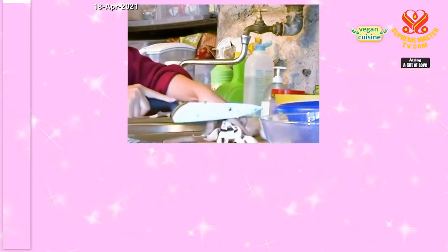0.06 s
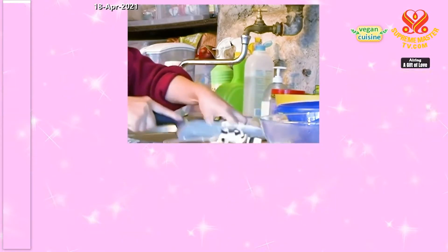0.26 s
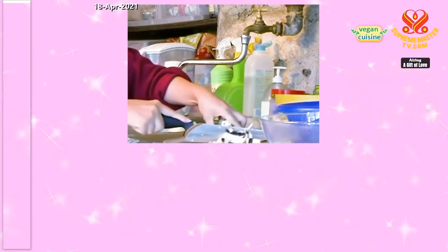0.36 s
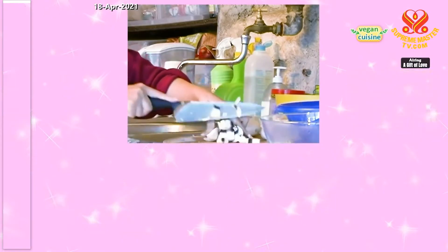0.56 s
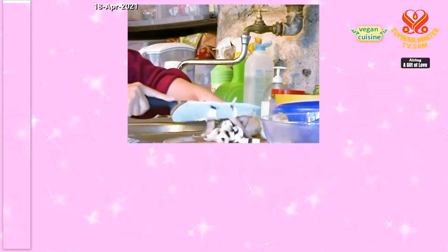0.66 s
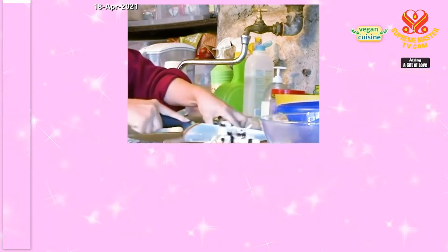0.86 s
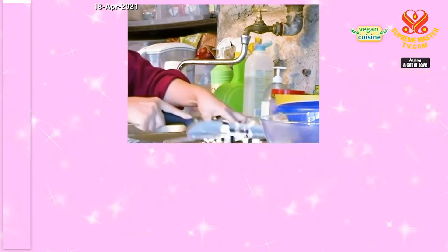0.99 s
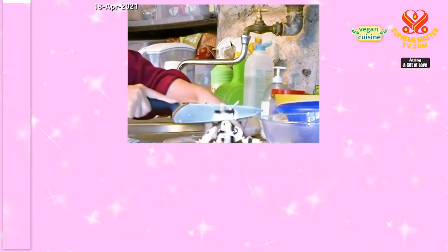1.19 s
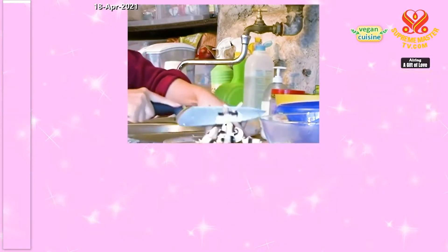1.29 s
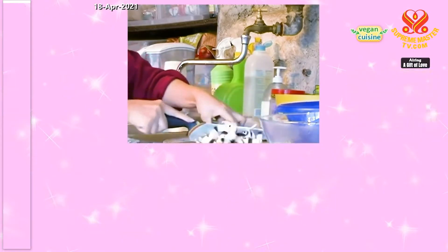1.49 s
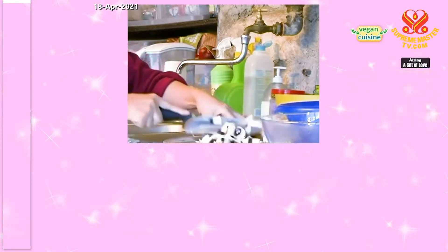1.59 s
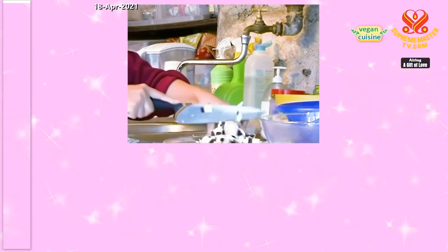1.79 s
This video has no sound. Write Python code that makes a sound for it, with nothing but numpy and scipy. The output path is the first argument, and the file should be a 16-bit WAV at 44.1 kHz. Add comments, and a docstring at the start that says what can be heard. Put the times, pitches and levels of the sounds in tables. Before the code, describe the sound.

A big knife chops vegetables on a cutting board three times at even intervals, each stroke a brief crisp crunch then a loud woody knock with a steel tick, close up in a small hard-walled kitchen.

```python
"""Knife on a kitchen board

A large knife slices through vegetables and lands on a board in a small hard-walled kitchen, three times.
Each stroke is a crackle of snapping fibres, a bright steel tick, the blade's blow and the heel following.
Blows, and faint later bursts, are ringing board modes plus coloured noise that swells and dies in the room.
Filtered noise makes hum, rumble and shuffling below; soft bumps are low resonances, lone snaps bright bursts.
The whole level sinks around each stroke's blows and steps back up."""
import sys
import numpy as np
from scipy import signal
from scipy.fft import rfft, irfft
from scipy.io import wavfile

SR = 44100
rng = np.random.default_rng(int(sys.argv[2]) if len(sys.argv) > 2 else 0)


def generate_wav(signal):
    """Clip the signal to [-1, 1] and save it as 16-bit WAV at the path in sys.argv[1]."""
    frames = np.transpose(np.atleast_2d(signal))
    scaled = np.clip(frames, -1, 1) * 32767
    pcm = np.round(scaled).astype(np.int16)
    wavfile.write(sys.argv[1], SR, pcm)


def rack_gain(trim_db):
    """Turn a fader trim in dB into the linear factor to multiply a signal by."""
    fader = np.asarray(trim_db, float)
    return 10 ** (fader / 20)


N = 81585

# Blade, then heel, meeting the board, and faint later bursts, some where the level steps back up.
# Each row: time in seconds, level at the knee in dB, slope below the knee in dB per octave,
# brightness an octave above the knee in dB, crack level in dB.
BLOWS = [(0.2139, -12.5, -1, 3, -21), (.2430, -10.5, -2.3, 3, -52), (0.263, -13, 1, 2.2, -48),
         (0.351, -37, -8.5, 2, -52), (0.7738, -11.5, 4, 1, -26.5), (.7800, -10.5, -1, -4.2, -36.5),
         (.8060, -8.5, -0.9, -0.6, -58), (.9530, -49.5, 13, 2.5, -69), (1.3355, -10.5, -1.3, -7.5, -28),
         (1.342, -11, 2, -11.5, -45), (1.3680, -10.5, -1, -7.5, -52), (1.5210, -51, 13, -17, -69),
         (1.5650, -52, 1, 4.8, -69)]
# Bright colour of snapping fibres. Each row: frequency in Hz, spectral level in dB per Hz (relative).
FIZZ_COLOUR = [(1880, -19), (3200, -20), (3760, -12.5), (4630, 0), (5360, -1.5), (5660, -4), (6130, -3),
               (9110, -7), (14300, -16), (15900, -33)]


def rms_one(x):
    """Scale to rms 1."""
    return x / np.sqrt(np.mean(x ** 2) + 1e-20)


def at_hz(points, hz, column=1):
    """Read a table on a log-frequency axis."""
    p = np.array(points, float)
    return np.interp(np.log(np.maximum(hz, 1)), np.log(p[:, 0]), p[:, column])


def colour(x, spectrum):
    """Shape a signal by a spectrum."""
    hz = np.arange(N // 2 + 1) * SR / N
    return irfft(rfft(x) * rack_gain(at_hz(spectrum, hz)), N)


def coloured_noise(spectrum):
    """Steady noise of rms 1 with the given spectrum."""
    return rms_one(colour(rng.standard_normal(N), spectrum))


def level_line(points):
    """Gain that follows straight lines in dB between (seconds, dB) points."""
    return rack_gain(np.interp(np.arange(N) / SR, *np.transpose(points)))


def drift(rate_hz):
    """Slow random wander of rms 1: noise through two equal low-pass poles."""
    r = np.exp(-2 * np.pi * rate_hz / SR)
    wander = signal.lfilter([1], [1, -2 * r, r * r], rng.standard_normal(N + SR))
    return rms_one(wander[SR:])  # the first second lets the filter settle


def grains(per_s, spread_db):
    """Dense random clicks of uneven size and random sign."""
    size = rack_gain(spread_db * np.minimum(rng.exponential(1, N), 5))
    sign = rng.choice([-1, 1], N)
    return size * sign * (rng.random(N) < per_s / SR)


def after(s, t60, rise):
    """Envelope that builds up from time s (rise is a time constant) while dying by 60 dB per t60."""
    t = np.maximum(np.arange(N) / SR - s, 0)
    return (1 - np.exp(-t / max(rise, 1e-4))) * np.exp(-np.log(1000) * t / t60)


def slope(hz, low, high):
    """Gain in dB of a blow's colour: a slope for two octaves below the knee, a shelf reached one octave above."""
    knee_hz = 900
    octaves = np.clip(np.log2(hz / knee_hz), -2, 1)
    return octaves * (low if hz < knee_hz else high)


def ring(drive, hz, t60):
    """A two-pole resonance: a unit click sets a decaying sine of height 1 ringing."""
    r, w = rack_gain(-60 / (t60 * SR)), 2 * np.pi * hz / SR
    return signal.lfilter([0, np.sin(w)], [1, -2 * r * np.cos(w), r * r], drive + 1e-18)


def tuned_push(hz, contact_s):
    """A smooth push lasting the contact time, carried on the resonance's own pitch."""
    push = np.hanning(max(int(contact_s * SR), 3))
    return 2 * push / push.sum() * np.cos(2 * np.pi * hz / SR * np.arange(len(push)))


def struck(modes, strength_db, contact_s):
    """Each row of BLOWS pushes every mode for the contact time, with a random strength of its own."""
    scatter_db = 3.5
    s, out = np.transpose(BLOWS)[0], 0
    scatter = rng.standard_normal((len(s), len(modes)))
    for k, (hz, mode_db, t60) in enumerate(modes):
        clicks = np.zeros(N)
        clicks[(s * SR).astype(int)] = rack_gain(strength_db(hz) + mode_db + scatter_db * scatter[:, k])
        drive = np.convolve(clicks, tuned_push(hz, contact_s))[:N]
        out = out + ring(drive, hz, t60)
    return out


def room_hum():
    """Steady coloured noise whose level flickers slightly."""
    # Colour of the room's hum. Each row: frequency in Hz, spectral level in dB per Hz (relative).
    hum_colour = [(18, -57), (30, -44), (81, -21), (134, -6), (226, 5.5), (383, -22.5), (472, -15),
                  (524, -22.5), (647, -9.5), (777, -25.5), (863, -9), (1060, -23), (1250, -11.5),
                  (1710, -5.5), (2280, -7.5), (3210, -14), (3560, -18.5), (6020, -19.5), (7050, -23),
                  (7620, -23.5), (15900, -23.5)]
    level_db, flicker_db, flicker_hz = -52.5, 0.5, 6.5
    return rack_gain(level_db + flicker_db * drift(flicker_hz)) * coloured_noise(hum_colour)


def rumble():
    """Distant rumble: a narrow band of low noise that swells and sinks."""
    # Loudness of the rumble. Each row: time in seconds, level in dB.
    rumble_level = [(0.0, -56), (0.056, -46.5), (0.144, -61), (0.206, -45.5), (0.612, -67.5), (0.85, -40),
                    (0.962, -57.5), (1.19, -73.5), (1.226, -84), (1.272, -58), (1.4, -40), (1.7, -71.5),
                    (1.808, -56), (1.85, -72)]
    centre_hz, width_hz = 84, 24
    edges_hz = [centre_hz - width_hz / 2, centre_hz + width_hz / 2]
    band = signal.butter(2, edges_hz, "band", fs=SR, output="sos")
    return level_line(rumble_level) * rms_one(signal.sosfilt(band, rng.standard_normal(N)))


def shuffle():
    """Low shuffling of hands and board: dull noise with a lumpy level."""
    # Loudness of the shuffling. Each row: time in seconds, level in dB.
    shuffle_level = [(0.0, -47), (0.154, -54.5), (0.354, -41), (0.498, -55.5), (0.704, -52), (0.844, -46),
                     (1.076, -56), (1.324, -53.5), (1.468, -60), (1.592, -48.5), (1.73, -56), (1.85, -45.5)]
    # Its colour. Each row: frequency in Hz, spectral level in dB per Hz (relative).
    shuffle_colour = [(71, -29), (120, -1.5), (238, -4), (371, -3.5), (512, -1.5), (590, -16.5), (741, -6),
                      (793, -12), (900, -22), (1170, -54), (1980, -120)]
    lump_db, lump_hz = 0.83, 21
    lumps = rack_gain(lump_db * drift(lump_hz))
    return level_line(shuffle_level) * lumps * coloured_noise(shuffle_colour)


def bumps():
    """Each bump of hand and board is a soft push on one low resonance."""
    # Soft low bumps. Each row: start of the push in seconds, strength in dB, pitch in Hz, t60 in seconds.
    bump_rows = [(.003, -36.5, 410, 0.046), (.033, -36, 391, 0.053), (.096, -44, 390, 0.038),
                 (0.173, -41, 210, 0.07), (0.743, -38, 211, 0.15), (1.528, -38, 290, 0.043),
                 (1.778, -38.5, 320, .06), (1.797, -41.5, 317, .07), (1.84, -40, 405, 0.066)]
    contact_s, out = 0.006, 0
    for s, db, hz, t60 in bump_rows:
        push, start = tuned_push(hz, contact_s), int(s * SR)
        drive = np.zeros(N + SR)  # room for a push near the end
        drive[start:start + len(push)] = rack_gain(db) * push
        out = out + ring(drive[:N], hz, t60)
    return out


def snaps():
    """Lone snaps and ticks: short bright noise bursts with the colour of the slicing fizz."""
    # Lone snaps. Each row: start in seconds, noise level in dB ahead of the burst's envelope.
    snap_rows = [(0.3516, -35), (0.673, -38), (0.6814, -47), (0.7472, -45), (0.7482, -29), (0.7534, -28.5),
                 (0.952, -49), (1.2754, -39), (1.2894, -34), (1.3024, -27)]
    t60_s, rise_s = 0.0075, 0.0007
    shape = sum(rack_gain(db) * after(s, t60_s, rise_s) for s, db in snap_rows)
    return coloured_noise(FIZZ_COLOUR) * shape


def slicing():
    """Fibres snap in a dense crackle while the blade passes through: one set of clicks in two colours."""
    # Blade through the vegetable, one list per stroke.
    # Each row: time in seconds, body level in dB, fizz level over the body in dB.
    strokes = [
        [(.07, -65, -1), (.11, -59, 1), (.145, -51.5, -3), (.176, -45.5, -2), (.195, -43, -1),
         (.212, -38.5, -1)],
        [(.64, -70, 1), (.668, -62, -2), (.678, -49, 3.5), (.712, -49, -2.5), (.746, -42.5, -2.5),
         (.765, -45.5, -2.5)],
        [(1.215, -67, -2), (1.251, -42.5, -4.5), (1.279, -34.5, -7), (1.3, -36, -5), (1.319, -38, -3),
         (1.332, -41, -2)],
    ]
    # Body of the crackle. Each row: frequency in Hz, spectral level in dB per Hz (relative).
    body_colour = [(530, -31), (900, -19), (1060, -51), (1100, -17.5), (1370, -9.5), (1530, -14),
                   (1650, -10), (2200, -1), (3600, -26), (4680, -46), (7920, -120)]
    fibres_per_s, fibre_spread_db, end_db_per_s = 5500, 2, 696
    t, out = np.arange(N) / SR, 0
    fibres = grains(fibres_per_s, fibre_spread_db)
    body, fizz = rms_one(colour(fibres, body_colour)), rms_one(colour(fibres, FIZZ_COLOUR))
    for rows in strokes:
        s, db, treble_db = np.transpose(rows)
        fade = (t > s[0]) * rack_gain(-end_db_per_s * np.maximum(t - s[-1], 0))
        body_gain = rack_gain(np.interp(t, s, db))
        fizz_gain = rack_gain(np.interp(t, s, db + treble_db))
        out = out + fade * (body_gain * body + fizz_gain * fizz)
    return out


def cracks():
    """The short bright tick of the steel edge, just before the weight lands; fainter ones lead the later bursts."""
    # Colour of the tick. Each row: frequency in Hz, spectral level in dB per Hz (relative).
    crack_colour = [(1940, -31), (3300, -7.5), (4930, 1), (5620, -12), (9900, -11), (11000, -11),
                    (12200, -24), (15000, -27), (15900, -29)]
    tick_db = 5.5  # over the crack level
    lead_s, rise_s, t60_s = 0.0018, 0.0021, 0.031
    shape = sum(rack_gain(row[-1] + tick_db) * after(row[0] - lead_s, t60_s, rise_s) for row in BLOWS)
    return coloured_noise(crack_colour) * shape


def board_ring():
    """Struck resonances: long-ringing modes follow the blow's weight, the short direct knock its crack."""
    # Modes of the board. Each row: frequency in Hz, strength in dB ahead of modes_db, t60 in seconds.
    board_modes = [(238.8, -13, 0.25), (290, -16.5, 0.53), (649.6, -15, 0.39), (717, -17, .25),
                   (805, -43, 0.11), (901, -19.5, 0.49), (1422, -7, .3), (1598, -12, 0.28),
                   (1677, -5.5, 0.24), (1718, -5, .3), (1923, -29, 0.44), (2082, -6, 0.28),
                   (2154, -5, 0.21), (2256, -9.5, 0.28), (2356, -11.5, 0.27)]
    # The direct knock. Each row: frequency in Hz, strength over the crack in dB, t60 in seconds.
    knock_modes = [(854, 13, 0.014), (1442, 7.5, 0.032), (2272, 18, 0.032), (2780, 12.5, 0.011),
                   (4890, -2.5, 0.013)]
    modes_db, modes_contact_s, knock_contact_s = -4, 0.0067, 0.0014
    _, db, low, high, crack_db = np.transpose(BLOWS)
    long_modes = struck(board_modes, lambda hz: db + modes_db + slope(hz, low, high), modes_contact_s)
    knock = struck(knock_modes, lambda hz: crack_db + slope(hz, low, high), knock_contact_s)
    return long_modes + knock


def blows():
    """Blows and later bursts fill the room with board colour; each third-octave builds and dies at its own pace."""
    # The board heard through the room. Each row: frequency in Hz, spectral level in dB per Hz (relative).
    board_colour = [(35, -58), (60, -26.5), (130, -12), (202, -20), (238, 2), (267, -15), (294, -2.5),
                    (330, -10.5), (362, -6.5), (468, -10.5), (713, -1), (820, 4.5), (965, -16),
                    (1080, -6.5), (1280, -3.5), (1500, 2.5), (1610, -5.5), (1730, 0.5), (2460, -6.5),
                    (3180, -27), (9740, -40), (14800, -60), (15900, -88)]
    # How the kitchen answers by pitch. Each row: frequency in Hz, t60 in seconds,
    # build-up time constant in seconds.
    kitchen = [(80, 0.29, 0.011), (254, 0.37, 0.013), (756, 0.28, 0.0024), (1510, .28, 0.009),
               (2530, .26, 0.00041), (4100, .3, 0.00074), (6900, 0.26, 0.00045), (11900, 0.14, 0.00064)]
    treble_above_hz, treble_tail_db = 3300, 19  # treble in the room follows the crack, this far over it
    noise = rfft(coloured_noise(board_colour))
    octave = np.log2(np.maximum(np.arange(len(noise)) * SR / N, 1))
    out = 0
    for centre in np.arange(18, 43) / 3:  # in octaves above 1 Hz
        # overlapping bands whose powers add up evenly
        share = np.sqrt(np.clip(1 - 3 * abs(octave - centre), 0, 1))
        hz = 2 ** centre
        t60, rise = at_hz(kitchen, hz), at_hz(kitchen, hz, column=2)
        power = 0
        for s, db, low, high, crack_db in BLOWS:
            if hz < treble_above_hz:
                band_db = db + slope(hz, low, high)
            else:
                band_db = crack_db + treble_tail_db
            power = power + (rack_gain(band_db) * after(s, t60, rise)) ** 2
        out = out + irfft(noise * share, N) * np.sqrt(power)
    return out


def scene():
    """All layers in the middle, plus a second draw of the cracks' treble in opposite phase left and right."""
    side_above_hz, side_db = 6300, -6.5
    background = room_hum() + rumble() + shuffle()
    strokes = slicing() + cracks() + board_ring() + blows()
    mid = background + bumps() + snaps() + strokes
    high_pass = signal.butter(4, side_above_hz, "high", fs=SR, output="sos")
    side = signal.sosfilt(high_pass, cracks())
    return mid + rack_gain(side_db) * side * np.array([[1], [-1]])


def top_cut(x):
    """Nothing passes above the cut-off."""
    return signal.sosfilt(signal.butter(12, 16290, fs=SR, output="sos"), x)


def record(dry):
    """Lows and the very top are cut; the level sinks just before each stroke's blow and steps back later."""
    # Dips of the whole level. Each row: start of the sink in seconds, end of the step back in seconds,
    # gain once sunk in dB, gain before the step back in dB.
    dips = [(.205, .352, -6, -8), (.757, .953, -6, -8), (1.322, 1.521, -6, -8)]
    sink_s, step_back_s, low_cut_hz, top_hz = 0.007, 0.001, 30, 16250
    t, db = np.arange(N) / SR, np.zeros(N)
    for down, up, first_db, last_db in dips:
        db += np.interp(t, [down, down + sink_s, up - step_back_s, up], [0, first_db, last_db, 0])
    cut = signal.sosfilt(signal.butter(3, low_cut_hz, "high", fs=SR, output="sos"), dry)
    cut = signal.sosfilt(signal.cheby2(14, 60, top_hz, fs=SR, output="sos"), cut)
    return top_cut(cut * rack_gain(db))


dry = scene()
out = record(dry)
generate_wav(out)
```